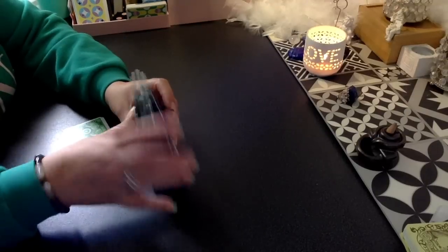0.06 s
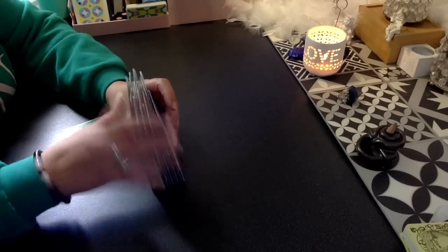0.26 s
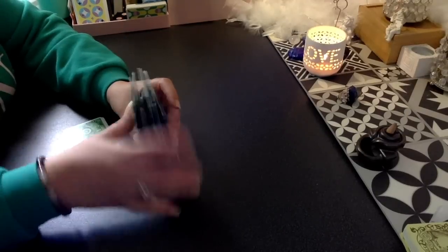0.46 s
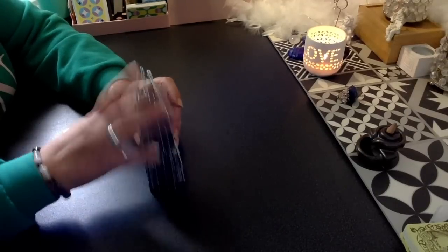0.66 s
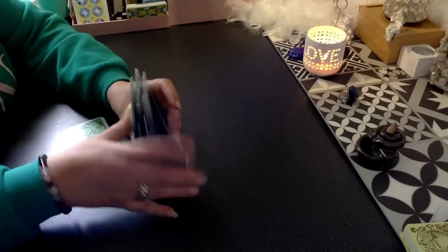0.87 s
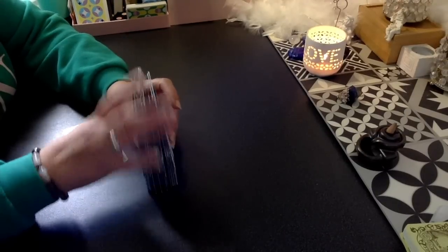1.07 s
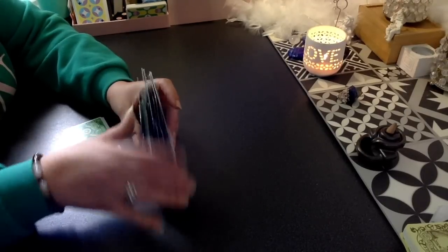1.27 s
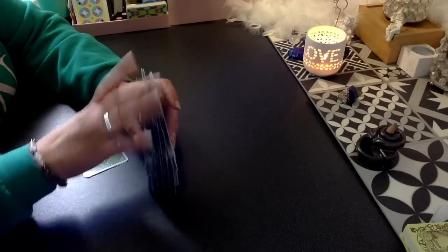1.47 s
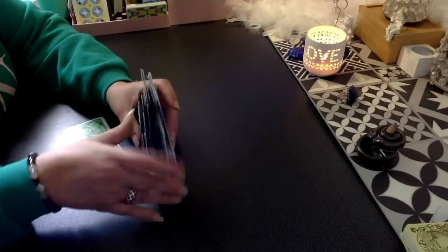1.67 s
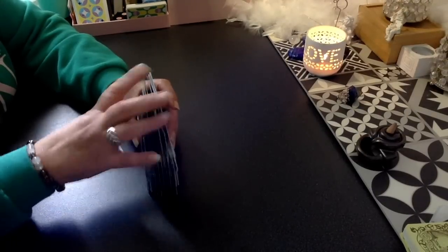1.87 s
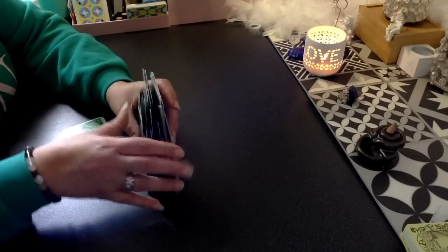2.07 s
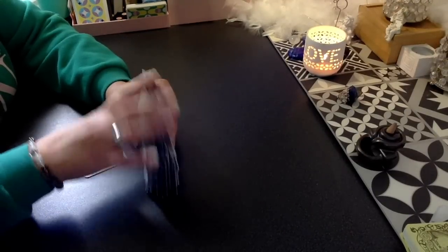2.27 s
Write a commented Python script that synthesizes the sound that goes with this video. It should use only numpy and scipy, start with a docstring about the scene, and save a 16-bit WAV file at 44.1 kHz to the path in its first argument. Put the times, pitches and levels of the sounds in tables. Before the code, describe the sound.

Close microphone on hands shuffling cards above a table: each stroke brings a light slide, then a dull or crisp slap as packets drop, with small-room reflections and a quiet low rumble.

```python
"""In a small room a deck of cards is shuffled overhand above a table, stroke after stroke. Card edges strike
the deck: a push of air and a noise burst, filtered by the deck's resonances. Cards rub and swish over each
other: trains of random slips, coloured and swelling. Knocks on the table thud as decaying sines and set off a
low boom. Shaped noise gives the room's reflections, the faint low rumble and the hiss underneath."""
import sys
import numpy as np
from scipy import signal
from scipy.fft import rfft, irfft
from scipy.io import wavfile

SR = 44100
rng = np.random.default_rng(int(sys.argv[2]) if len(sys.argv) > 2 else 0)


def wav_record(signal):
    """Record a signal, one row per channel, as 16-bit PCM in the file named by sys.argv[1]."""
    frames = np.transpose(np.atleast_2d(signal))
    bounded = np.clip(frames, -1, 1)
    # unit amplitude maps onto the largest positive 16-bit level
    quanta = np.round(bounded * 32767).astype(np.int16)
    wavfile.write(sys.argv[1], SR, quanta)


N = 101429

# base colour of card edges on the deck: (frequency [Hz], gain [dB])
CLATTER_COLOUR = [(100, -5.5), (260, 2.5), (400, -6.5), (600, 1.5), (1200, -16.5), (2600, 0.5), (4200, -3),
                  (6300, -2), (8000, 1.5), (11000, -6.5), (16000, -23.5)]


def amp(db):
    """Decibels to gain."""
    return 10 ** (np.asarray(db) / 20)


def unit(x):
    """Scales to energy 1."""
    return x / np.sqrt(np.sum(x ** 2) + 1e-20)


def read(points, hz):
    """Interpolates a table on a log-frequency axis."""
    f, value = np.transpose(points)
    return np.interp(np.log(hz + 1), np.log(f), value)


def add(mix, start_s, sound):
    """Mixes a sound in at start_s; cuts whatever falls outside the mix."""
    at = round(start_s * SR)
    sound = sound[max(-at, 0):]
    part = mix[max(at, 0):][:len(sound)]
    part += sound[:len(part)]


def colour(x, gain):
    """Minimum-phase filter whose gain is a function of frequency."""
    hz = abs(np.fft.fftfreq(4096, 1 / SR))
    log_gain = np.log(np.maximum(gain(hz), 1e-5))
    spectrum = np.exp(np.conj(signal.hilbert(log_gain)))
    impulse = np.fft.ifft(spectrum).real[:2048]
    return signal.fftconvolve(x, impulse)[:len(x)]


def soften(hz, corner_hz, leak_db):
    """Gain of a soft contact: treble falls steeply above the corner, down to a faint fizz."""
    return np.sqrt(1 / (1 + (hz / corner_hz) ** 6) + amp(leak_db) ** 2)


def deck(base):
    """Gain of the held deck: resonances on a base colour, a little different at every contact."""
    # resonances: (frequency [Hz], level [dB], t60 [s])
    resonances = [(751.5, 6.5, 0.11), (910, 3.5, 0.031), (1170, 10, 0.045), (1317, 3.5, 0.015),
                  (1544, 7, 0.12), (1710, 8.5, .035), (1980, 5.5, 0.017), (2220, 8, 0.017),
                  (2687, 14.5, 0.024), (2825, 10.5, 0.039), (3507, 8, 0.017), (3773, 7.5, 0.019),
                  (4617, 9.5, 0.013), (5610, 6.5, 0.036)]
    level_spread_db, pitch_spread = -2, 0.012
    chance = rng.standard_normal((len(resonances), 2))

    def gain(hz):
        peaks = 0
        for (f, db, t60_s), (a, b) in zip(resonances, chance):
            offset_hz = hz - f * (1 + pitch_spread * b)
            detune = offset_hz * 2 * np.pi * t60_s / np.log(1000)
            peaks = peaks + amp(db + level_spread_db * a) ** 2 / (1 + detune ** 2)
        base_db = read(base, hz)
        drive = amp(base_db - read(CLATTER_COLOUR, hz))  # peaks follow the base colour
        return np.sqrt(amp(base_db) ** 2 + peaks * drive ** 2)
    return gain


def tap(db, hard_hz, bass_hz, push_db):
    """One push of air and the clatter of many card edges arriving ring the deck."""
    push_s, edges_rise_s, leak_db = 0.00009, 0.00027, -24
    edges_t60_s = 0.042  # before the second fade below
    t = np.arange(SR // 10) / SR
    push = -unit(t / push_s * np.exp(-t / push_s))
    envelope = (1 - np.exp(-t / edges_rise_s)) * amp(-60 * t / edges_t60_s)
    edges = rng.standard_normal(len(t)) * envelope
    edges = irfft(np.exp(1j * np.angle(rfft(edges))), len(t))  # flat spectrum
    edges = edges * np.sqrt(envelope)
    blow = unit(colour(amp(push_db) * push + unit(edges), deck(CLATTER_COLOUR)))

    def contact(hz):
        return soften(hz, hard_hz, leak_db) * hz / np.hypot(hz, bass_hz)
    return amp(db) * colour(blow, contact)


def slips(length_s, top, power, spread_db):
    """A train of tiny slips of random size and sign that swells and fades."""
    slips_per_s = 3000
    u = np.arange(SR // 5) / SR / length_s
    swell = np.interp(u, [0, np.clip(top, .05, .95), 1], [0, 1, 0]) ** power
    size = amp(spread_db * np.minimum(rng.exponential(1, len(u)), 4))
    size = size * rng.choice([-1, 1], len(u))
    return swell * size * (rng.random(len(u)) < slips_per_s / SR)


def slide(length_s, db, corner_hz, top):
    """Cards rub under pressure: slips coloured by the deck, dulled by the soft contact."""
    # base colour: (frequency [Hz], gain [dB])
    rub_colour = [(100, -22), (300, 6), (400, 4.5), (700, 10), (1200, -9.5), (1800, -2.5), (2800, -1.5),
                  (4500, -3), (8000, -6.5), (16000, -36)]
    swell_power, spread_db, leak_db = 0.52, 3.5, -30.5
    rub = colour(slips(length_s, top, swell_power, spread_db), deck(rub_colour))
    rub = unit(colour(rub, lambda hz: soften(hz, corner_hz, leak_db)))
    return amp(db) * np.sqrt(length_s * SR) * rub


def swish(length_s, db, top):
    """Smooth card faces glide over each other: slips coloured to a fine hiss."""
    # colour: (frequency [Hz], gain [dB])
    swish_colour = [(100, -40), (600, -1.5), (2000, 2), (3500, 3.5), (5000, 4), (6500, -3.5), (9000, -3),
                    (12000, -6), (16000, -18.5)]
    swell_power, spread_db = 0.53, 2.5
    drive = slips(length_s, top, swell_power, spread_db)
    hiss = unit(colour(drive, lambda hz: amp(read(swish_colour, hz))))
    return amp(db) * np.sqrt(length_s * SR) * hiss


def thud(db, pitch_hz, boom_db):
    """A dull, quickly dying sine push, and the low boom that builds up and lingers after it."""
    # low resonances of table and room: (frequency [Hz], level [dB], t60 [s])
    modes = [(177.5, -5.5, 0.28), (192.5, -4, 0.43), (241.7, -14.5, 0.48), (289, -25, 0.47),
             (322.5, -19.5, 0.48)]
    push_cycles, swell_s = 0.6, 0.016
    t = np.arange(SR) / SR
    age = t * pitch_hz / push_cycles
    push = 2 * age * np.exp(1 - 2 * age) * np.sin(2 * np.pi * pitch_hz * t)  # envelope peaks at age 0.5
    boom = np.zeros(len(t))
    for f, level_db, t60_s in modes:
        boom += amp(level_db - 60 * t / t60_s) * np.sin(2 * np.pi * (f * t + rng.random()))
    return amp(db) * push + amp(boom_db) * boom * (1 - np.exp(-t / swell_s)) ** 2


def room(x):
    """A small room: dense reflections, each band dying at its own speed, and two narrow rings."""
    # colour of the reflections: (frequency [Hz], level [dB])
    room_colour = [(100, 16.5), (300, 18), (700, 3.5), (2000, 1), (5000, -1), (7500, 3), (12000, 1),
                   (16000, 1.5)]
    # decay: (frequency [Hz], t60 [s])
    room_t60 = [(100, 0.3), (300, 0.19), (420, 0.073), (800, 0.14), (2000, 0.17), (5000, 0.17),
                (8000, 0.14), (12000, 0.14), (16000, 0.31)]
    # narrow lingering rings: (frequency [Hz], width [Hz], level [dB], t60 [s])
    rings = [(1198, 150, -19.5, 0.074), (7186, 520, -16.5, 0.25)]
    build_up_s = 0.0055
    hz, t, z = signal.stft(rng.standard_normal(SR // 2), SR, nperseg=256)
    z = z * amp(read(room_colour, hz)[:, None] - 60 * t / read(room_t60, hz)[:, None])
    tail = signal.istft(z, SR, nperseg=256)[1]
    age_s = np.arange(len(tail)) / SR
    tail = unit(tail * np.minimum(age_s / build_up_s, 1) ** 2)
    for f, width_hz, db, t60_s in rings:
        band = np.exp(-((np.fft.rfftfreq(len(tail), 1 / SR) - f) / width_hz) ** 2)
        ring = irfft(rfft(rng.standard_normal(len(tail))) * band, len(tail))
        tail = tail + amp(db) * unit(ring * amp(-60 * age_s / t60_s))
    return signal.fftconvolve(x, tail)[:N]


def noise(points):
    """Steady noise of a given colour, rms 1."""
    spectrum = rfft(rng.standard_normal(N)) * amp(read(points, np.fft.rfftfreq(N, 1 / SR)))
    return np.sqrt(N) * unit(irfft(spectrum, N))


def background():
    """An ebbing low rumble and faint steady hiss, both shaped noise."""
    # spectra, relative: (frequency [Hz], density [dB per Hz])
    rumble_colour = [(10, -19), (22, 2.5), (28, 3.5), (36, 3), (55, -19), (80, -23.5), (130, -29.5),
                     (190, -17), (240, -20), (330, -24.5), (380, -41.5), (800, -72.5)]
    hiss_colour = [(50, 3), (400, -1), (1000, -4.5), (3000, -8), (8000, -15.5), (16000, -20)]
    # rumble: (time [s], level [dB])
    rumble_level = [(0.0, -38), (0.03, -40.5), (0.5, -41.5), (0.52, -44), (1.54, -47), (1.56, -43.5),
                    (2.18, -48), (2.3, -49.5)]
    hiss_db = -70.5
    rumble_db = np.interp(np.arange(N) / SR, *np.transpose(rumble_level))
    return amp(rumble_db) * noise(rumble_colour) + amp(hiss_db) * noise(hiss_colour)


def scene():
    """Cards, dry and through the room, over the thuds and the background."""
    # card strikes: (time [s], level before contact filter [dB], hardness as treble corner [Hz],
    # weight as bass corner [Hz], push of air relative to clatter [dB])
    tap_events = [(0.091, -19, 9000, 900, -7), (0.144, -3.5, 3240, 294, -4), (0.1515, 0, 5500, 482, 0),
                  (.171, -9, 10000, 1500, 16), (0.223, -19.5, 2780, 383, 12), (0.378, 1, 1930, 248, -1.5),
                  (.3815, -7.5, 2315, 399, -2.5), (0.516, 6, 11500, 1000, -10),
                  (0.7485, -21.5, 1670, 297, -20), (0.7848, -10.5, 4500, 1740, -2.5),
                  (0.884, 3.5, 4750, 314, 2.5), (0.9008, -2, 3270, 700, -11.5),
                  (1.138, -11.5, 1249, 411, 5), (1.1425, -14.5, 1476, 500, -5), (1.22, -20, 6000, 400, 0),
                  (1.3123, 4.5, 10200, 510, -14.5), (1.533, -31.5, 8000, 202, 8),
                  (1.6095, 1.5, 4170, 506, -13), (1.6968, 0.5, 10000, 400, -8.5),
                  (1.9212, -4, 1990, 302, -8), (1.9279, -6, 1820, 397, 11.5), (1.9666, 2, 9900, 510, -9),
                  (1.99, -7.5, 4470, 470, -5)]
    # rubs: (start [s], length [s], level [dB], treble corner [Hz], place of swell's top [0-1])
    slide_events = [(-.02, 0.068, -60.5, 2650, 0), (.075, 0.069, -46.5, 2870, 0.47),
                    (0.443, 0.069, -41.5, 2356, 0.58), (0.74, 0.016, -44.5, 1880, 0.6),
                    (0.79, 0.067, -48.5, 4560, 0.91), (0.863, 0.014, -41, 3200, 0.1),
                    (0.969, 0.045, -63, 2030, 0.22), (1.171, 0.085, -63.5, 2830, .9),
                    (1.248, 0.046, -38.5, 2500, 0.37), (1.286, 0.025, -46, 1310, 1),
                    (1.583, 0.03, -40.5, 1320, 0.25), (1.653, 0.046, -39.5, 2130, 0.52),
                    (1.909, 0.13, -61, 1900, 0.26), (2.019, 0.042, -52.5, 1250, 0.26),
                    (2.249, 0.061, -65, 2580, 0)]
    # gliding faces: (start [s], length [s], level [dB], place of swell's top [0-1])
    swish_events = [(-.02, 0.075, -65.5, 0.46), (0.06, 0.14, -60.5, 0.3), (0.136, .026, -50, 0.9),
                    (0.363, 0.17, -60.5, .85), (0.737, .05, -62, 0.2), (0.794, 0.1, -52, 1),
                    (.876, 0.021, -32.5, 0.4), (.89, 0.036, -51.5, 0), (1.128, 0.081, -63, 0.8),
                    (1.213, 0.02, -57, 0.5), (1.238, 0.089, -61, 0.5), (1.534, 0.081, -58.5, 0.48),
                    (1.616, 0.1, -62, 0.73), (1.906, 0.08, -60.5, 0.2), (2.244, 0.057, -62.5, 0.77)]
    # soft knocks on the table: (time [s], thud level [dB], thud pitch [Hz], boom level [dB])
    thud_events = [(.005, -43, 65, -34), (.146, -32, 85, -26), (0.376, -27.5, 62.5, -23.5),
                   (.516, -32.5, 117, -35.5), (.745, -34.5, 70.4, -34), (0.883, -52, 121, -39.5),
                   (0.911, -33.5, 111, -35.5), (1.139, -35.5, 104, -44.5), (1.313, -39, 122, -35),
                   (1.539, -35.5, 52.5, -33.5), (1.611, -37, 79.4, -36.5), (1.698, -67, 111, -53.5),
                   (1.921, -35.5, 80, -35.5), (1.966, -32, 110, -35.5), (2.252, -37.5, 90, -39.5)]
    room_db = -6.5
    cards, low = np.zeros(N), background()
    for start_s, *row in tap_events:
        add(cards, start_s, tap(*row))
    for start_s, *row in slide_events:
        add(cards, start_s, slide(*row))
    for start_s, length_s, db, top in swish_events:
        add(cards, start_s, swish(length_s, db, top))
    for start_s, *row in thud_events:
        add(low, start_s, thud(*row))
    return (cards + amp(room_db) * room(cards) + low)[None]


def record(dry):
    """The recorder's band limit: a linear-phase low-pass."""
    edge_hz = 16000
    lowpass = signal.firwin(255, edge_hz, window=("kaiser", 9), fs=SR)
    return signal.oaconvolve(dry, lowpass[None], "same")


dry = scene()
out = record(dry)
wav_record(out)
```